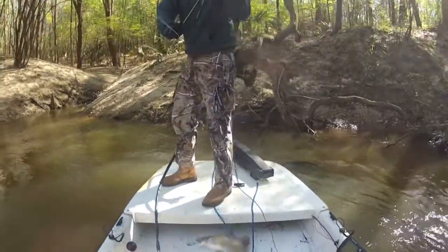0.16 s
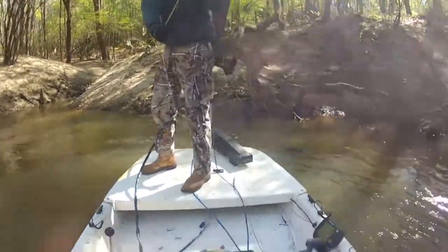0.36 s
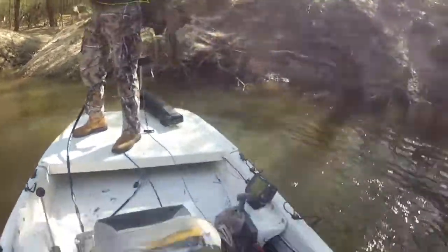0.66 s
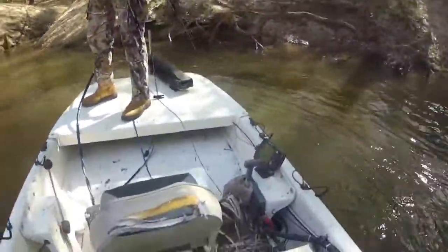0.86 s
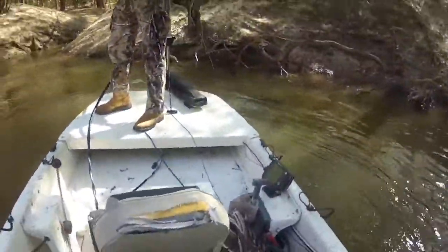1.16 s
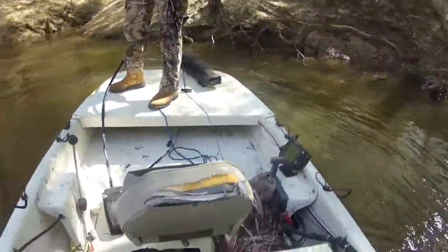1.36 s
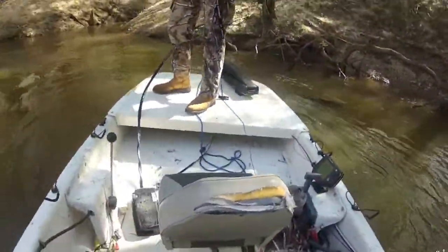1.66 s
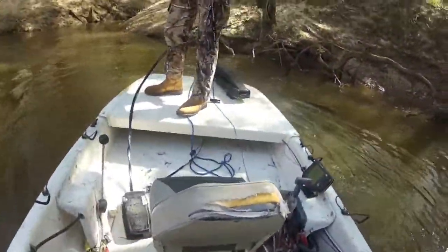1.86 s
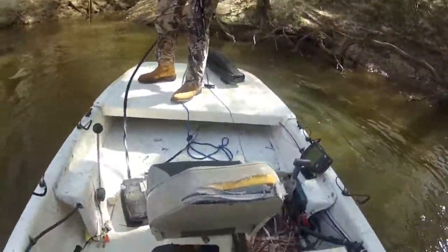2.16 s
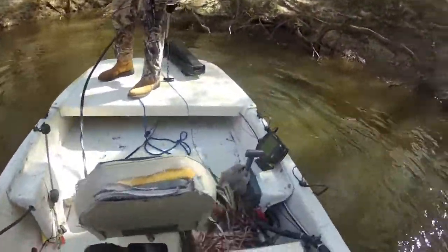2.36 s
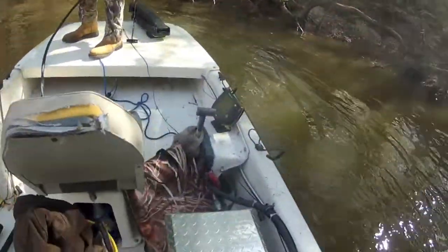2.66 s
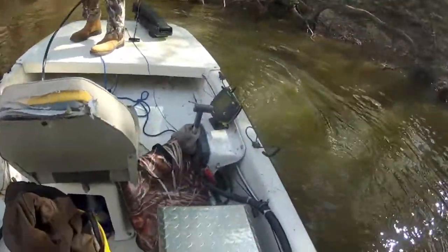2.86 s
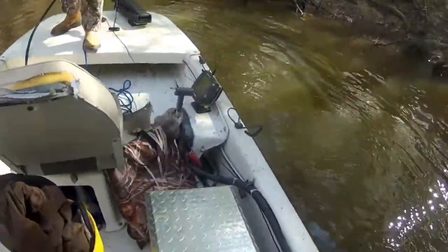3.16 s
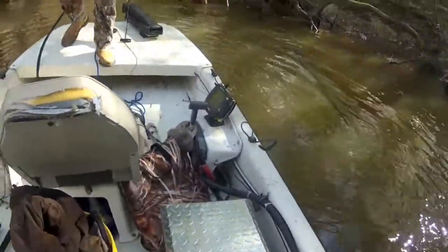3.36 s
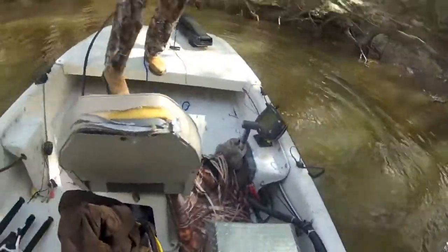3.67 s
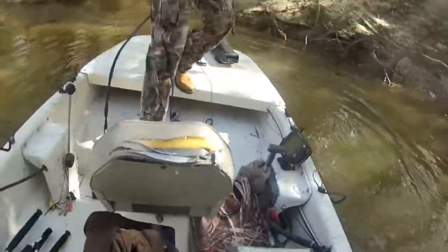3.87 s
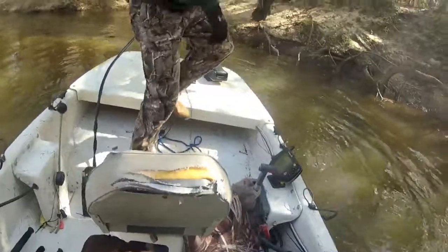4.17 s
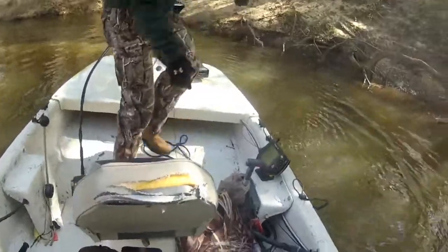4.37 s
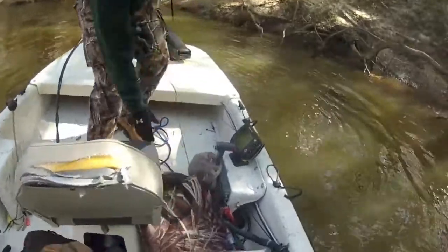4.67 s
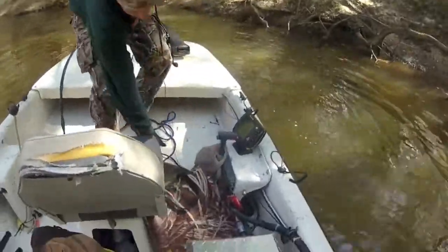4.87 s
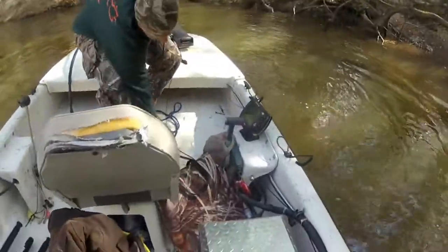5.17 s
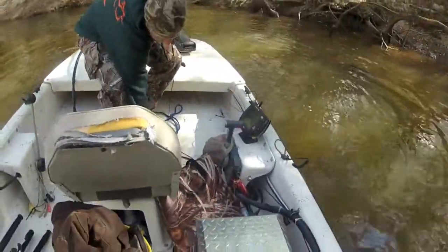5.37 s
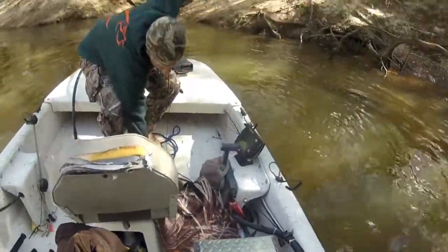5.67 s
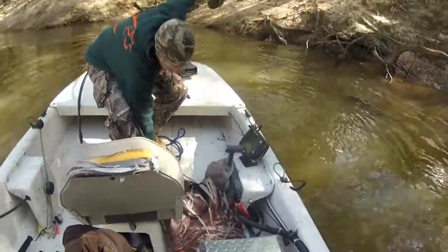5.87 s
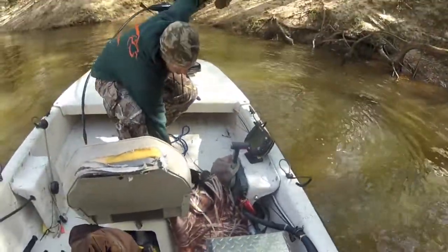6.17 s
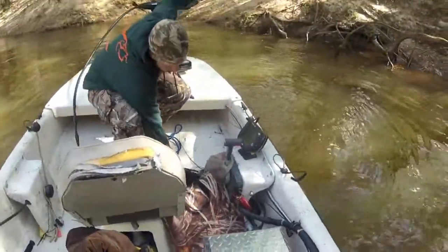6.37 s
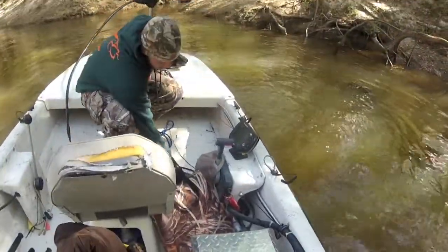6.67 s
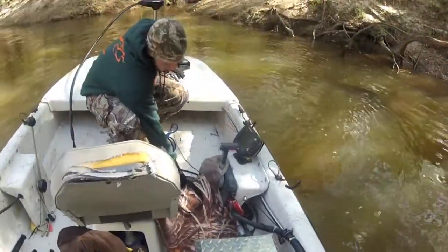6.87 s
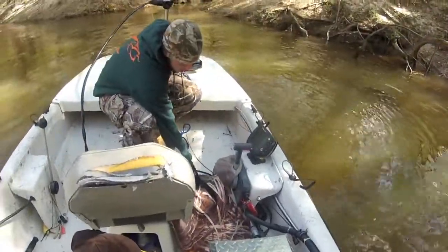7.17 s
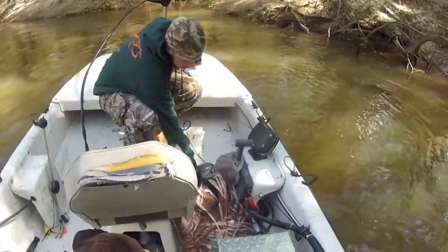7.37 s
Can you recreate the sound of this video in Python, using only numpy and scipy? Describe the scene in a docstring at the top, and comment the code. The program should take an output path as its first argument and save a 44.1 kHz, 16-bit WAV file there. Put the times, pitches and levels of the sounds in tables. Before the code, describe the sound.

On a small open boat on a quiet river, water laps the hull in short bubbly surges. The first two seconds are busiest, with soft low thumps and bright knocks; a hard crack and tiny rattle come just after three seconds, a strong splashy knock past four, then sparser laps. Drops trickle throughout. The microphone sits close in a sealed housing, boxy, mono, with coarse treble.

```python
"""Water laps against a small open boat on a river, heard as through a sealed housing.
Surges shape bubble fizz along the side, stray ticks and noise that drives hull modes; soft thumps swing low.
Drops trickle back as patter and short rings; gear and water knock on the sides over a steady fading rumble.
A 12 kHz sample-and-hold mirrors the sound in the treble."""
import sys
import numpy as np
from scipy import signal
from scipy.fft import rfft, irfft, next_fast_len
from scipy.io import wavfile

SR = 44100
rng = np.random.default_rng(int(sys.argv[2]) if len(sys.argv) > 2 else 0)


def bounce(signal):
    """Save signal as a 16-bit WAV file at the path given by the first command-line argument."""
    frames = np.transpose(np.atleast_2d(signal))
    limited = np.clip(frames, -1, 1)
    pcm = np.round(limited * 32767).astype(np.int16)
    wavfile.write(sys.argv[1], SR, pcm)


N = 331178

# relative spectrum of water on the side: f/Hz, density/dB
WATER_SPECTRUM = [(150, -47), (250, -4.5), (511, -10.5), (583, -14), (648, -3.5), (701, -12), (938, -4.5),
                  (1160, -13.5), (1840, 1.5), (2370, 1), (2890, -11.5), (3480, -1), (4470, -37.5),
                  (5170, -17), (5900, -52), (7670, -51), (13000, -120)]


def from_db(db):
    """Amplitude gain of a level in dB."""
    return 10 ** (np.asarray(db) / 20)


def rms_one(x):
    """Scale to rms 1."""
    return x / np.sqrt(np.mean(x ** 2) + 1e-20)


def peak_one(x):
    """Scale to peak 1."""
    return x / np.max(np.abs(x))


def in_time(rows):
    """Interpolate each column after the first (t/s) to every sample."""
    t_s, *columns = np.transpose(rows)
    return [np.interp(np.arange(N) / SR, t_s, column) for column in columns]


def drift(rate_hz):
    """Slow noise: white noise through two equal one-pole low-passes, rms 1."""
    r = np.exp(-2 * np.pi * rate_hz / SR)
    white = rng.standard_normal(N + SR)
    settled = signal.lfilter([1], [1, -2 * r, r * r], white)[SR:]
    return rms_one(settled)


def colour(x, spectrum, size=4096):
    """Minimum-phase filter by the folded cepstrum; white noise keeps its rms."""
    hz, db = np.transpose(spectrum)
    log_bins = np.log(np.fft.rfftfreq(size, 1 / SR) + 1)
    log_gain = np.log(from_db(np.interp(log_bins, np.log(hz), db)))
    cepstrum = irfft(log_gain)
    cepstrum[1:size // 2] *= 2
    cepstrum[size // 2 + 1:] = 0
    pulse = irfft(np.exp(rfft(cepstrum)))
    unit_pulse = pulse / np.sqrt(np.sum(pulse ** 2))
    return signal.oaconvolve(x, unit_pulse)[:len(x)]


def resonance(x, hz, width_hz):
    """Two-pole resonance, gain about 1 on top."""
    r = np.exp(-np.pi * width_hz / SR)
    zeros = [(1 - r * r) / 2, 0, (r * r - 1) / 2]
    poles = [1, -2 * r * np.cos(2 * np.pi * hz / SR), r * r]
    return signal.lfilter(zeros, poles, x)


def ringing(x, hz, width_hz):
    """The resonance twice, for steep skirts."""
    return resonance(resonance(x, hz, width_hz), hz, width_hz)


def grains(per_s, spread_db, clump_db, clump_rate_hz):
    """Random clicks of uneven size and either sign, in clumps; rms 1."""
    sizes = from_db(spread_db * np.minimum(rng.exponential(1, N), 4))
    signs = rng.choice([-1, 1], N)
    struck = rng.random(N) < per_s / SR
    clumps = from_db(clump_db * np.minimum(drift(clump_rate_hz), 1.6))
    return rms_one(sizes * signs * struck * clumps)


def surges():
    """Wash level, rumble drive and brightness (dB): powers of surges that build and ebb add to a calm."""
    # crest/s, wash level/dB, build-up/s, ebb/s, rumble drive/dB re wash, brightness/dB per zone
    surge_rows = [(0.125, -45.5, 0.02, 0.19, 8, -0.5), (0.311, -37.5, 0.056, 0.08, 9, -0.5),
                  (0.521, -42.5, 0.11, 0.057, 6.5, -1), (0.761, -47, 0.25, 0.082, 7.5, 0.5),
                  (0.894, -38, 0.034, 0.02, -4.5, 4.5), (1.118, -33, 0.09, 0.12, -1.5, -1),
                  (1.32, -40, .12, 0.072, -2, -0.5), (1.61, -46.5, 0.13, 0.044, -7, 0.5),
                  (1.76, -31, 0.088, 0.19, -0.5, -0.5), (1.92, -38, 0.15, 0.21, 0.5, -1.5),
                  (2.149, -43, 0.06, 0.11, 8, 2), (2.598, -50.5, 0.52, 0.26, -4, 2),
                  (2.897, -38, 0.15, 0.065, -0.5, 1.5), (2.99, -44.5, 0.034, 0.042, 4, 0.5),
                  (3.18, -61.5, 0.11, 0.18, 17, 3), (3.335, -49.5, 0.077, .06, -2, -3.5),
                  (3.41, -43.5, 0.065, .06, -2.5, 1.5), (3.598, -39.5, 0.12, 0.12, 6.5, 0.5),
                  (3.97, -51, 0.045, 0.15, -10, -2), (4.3, -30, 0.072, 0.11, 3.5, 3),
                  (4.46, -47, .06, 0.13, -5, 0.5), (4.64, -44, 0.075, 0.063, 4, -1.5),
                  (4.83, -47.5, 0.094, 0.065, -1, -0.5), (4.99, -47.5, 0.081, 0.039, -2, 5),
                  (5.42, -50.5, 0.055, 0.035, 11.5, -1), (5.475, -42.5, 0.028, 0.017, -1, 2.5),
                  (5.58, -32.5, 0.069, 0.077, 2, 0), (5.992, -49.5, 0.25, 0.06, 6.5, -0.5),
                  (6.209, -43.5, 0.078, 0.14, -4.5, -1), (6.65, -47, 0.026, 0.037, 1.5, 0.5),
                  (6.81, -40, 0.062, 0.17, -0.5, -0.5), (6.89, -43.5, 0.091, 0.15, 4, -1.5),
                  (7.07, -51, 0.057, 0.067, 5, -1), (7.41, -40, 0.09, 0.094, -2, 1)]
    span_db = 22.5  # fall one build-up before or one ebb after the crest
    build_power, ebb_power = 1.8, 1.85
    calm_wash_db, calm_rumble_db = -63.5, -54.5
    t = np.arange(0, N, 64) / SR
    crest_s, crest_db, build_s, ebb_s, push_db, tilt_db = np.transpose(surge_rows)[:, :, None]
    before = np.abs((t - crest_s) / build_s) ** build_power
    after = np.abs((t - crest_s) / ebb_s) ** ebb_power
    away = np.where(t < crest_s, before, after)
    power = from_db(2 * np.maximum(crest_db - span_db * away, -200))
    wash_power = power.sum(0) + from_db(2 * calm_wash_db)
    rumble_power = (power * from_db(2 * push_db)).sum(0) + from_db(2 * calm_rumble_db)
    bright_db = (power * tilt_db).sum(0) / wash_power
    rows = [t, 10 * np.log10(wash_power), 10 * np.log10(rumble_power), bright_db]
    return in_time(np.transpose(rows))


def wash(level_db, bright_db):
    """Bubble fizz: zones share some clicks and have flurries of their own; brightness tilts them."""
    # pass-bands: low f/Hz, high f/Hz
    zones_hz = [(250, 1300), (1300, 2100), (2100, 3000), (3000, 4400), (4400, 6500)]
    shared = grains(4000, spread_db=0.5, clump_db=4.0, clump_rate_hz=108)
    out = 0
    for step, zone_hz in enumerate(zones_hz, start=-2):
        flurries = grains(1200, spread_db=2.5, clump_db=5.5, clump_rate_hz=18.5)
        fizz = (shared + 0.89 * flurries) * from_db(level_db + step * bright_db)
        band = signal.butter(2, zone_hz, "band", fs=SR, output="sos")
        out = signal.sosfilt(band, fizz) - out  # neighbours get opposite signs
    return colour(out, WATER_SPECTRUM)


def rumble(level_db):
    """The push of the water, lumpy noise, drives the panel modes of the hull."""
    # modes: f/Hz, width/Hz, relative level/dB
    modes = [(35, 40.3, -6.5), (91, 32.6, 0.5), (194.3, 40.9, -3), (484, 11.6, -16.5), (921, 29, -22)]
    push = rng.standard_normal(N) * from_db(level_db + 2.0 * drift(7.5))
    out = np.zeros(N)
    for k, (hz, width_hz, db) in enumerate(modes):
        out += (-1) ** k * from_db(db) * resonance(push, hz, width_hz)
    return from_db(26.5) * out


def thumps():
    """A soft blow swells over about a cycle and leaves the hull swinging."""
    # onset/s, peak/dB, f/Hz
    thump_rows = [(0.031, -33.5, 85), (0.122, -19.5, 84), (0.201, -25, 84), (0.288, -35, 77),
                  (0.323, -18, 69.4), (0.368, -19.5, 86), (0.495, -32, 40.3), (0.668, -28, 38),
                  (1.081, -26, 88), (1.121, -19.5, 86), (1.298, -30, 103), (1.62, -33, 88.5),
                  (1.728, -21, 77), (1.741, -13, 58.7), (1.789, -30, 92), (1.929, -27, 90),
                  (2.14, -28, 64.5), (2.548, -28.5, 83), (2.856, -28.5, 98), (2.908, -28.5, 102.5),
                  (3.136, -28, 91), (3.801, -28.5, 82), (3.841, -33, 90), (4.275, -19, 106.4),
                  (4.299, -23, 95.7), (4.339, -27, 99), (4.6, -32, 64), (4.998, -29, 103),
                  (5.503, -27.5, 92), (5.561, -37, 88.5), (5.597, -23.5, 91), (6.611, -34, 94),
                  (6.789, -30, 97), (6.871, -34, 106), (6.93, -30, 100)]
    t60_s = 0.14
    out, age_s = np.zeros(N + SR), np.arange(SR // 2) / SR
    signs = rng.choice([-1, 1], len(thump_rows))
    for (onset_s, peak_db, hz), sign in zip(thump_rows, signs):
        envelope = (1 - np.exp(-1.5 * hz * age_s)) * from_db(-60 * age_s / t60_s)
        swing = envelope * np.sin(2 * np.pi * hz * age_s)
        at = round(onset_s * SR)
        out[at:at + len(age_s)] += sign * from_db(peak_db) * peak_one(swing)
    return out[:N]


def ticks(wash_db):
    """Stray droplets strike the side as short noise bursts, harder during a surge."""
    mean_db, follow_share, t60_s = -50, 0.52, 0.028
    hits = grains(45, spread_db=3.5, clump_db=2.0, clump_rate_hz=5.0)
    r = from_db(-60 / (t60_s * SR))
    envelope = signal.lfilter([1], [1, -r], np.abs(hits))
    bursts = rms_one(envelope * rng.standard_normal(N))
    level_db = mean_db + follow_share * (wash_db - wash_db.mean())
    return colour(bursts * from_db(level_db), WATER_SPECTRUM)


def trickle():
    """Drops fall back: a patter, and short rings whose pitches scatter about a moving centre."""
    # t/s, drive/dB, centre f/Hz of the rings
    drip = [(0, -48.5, 2460), (0.3, -45, 2340), (0.5, -45, 2430), (0.68, -40.5, 2710), (0.9, -50.5, 2340),
            (1.2, -35, 2420), (1.45, -51, 2320), (1.72, -37, 2380), (2.15, -50.5, 2450), (2.65, -36, 2450),
            (3.07, -43.5, 2420), (3.3, -52, 2550), (3.68, -37.5, 2690), (4.22, -51.5, 2700),
            (4.45, -41, 2660), (4.7, -47.5, 2690), (5.05, -45, 2700), (5.4, -52, 2430), (6.05, -46.5, 2400),
            (6.4, -45, 2650), (6.68, -44.5, 2600), (6.9, -43, 2270), (7.2, -58, 2370), (7.51, -41, 2450)]
    # patter spectrum: f/Hz, relative density/dB
    patter_spectrum = [(150, -33), (250, 3.5), (408, -49), (511, -7), (591, -20), (780, -11), (1400, -28),
                       (2340, -1), (3620, -52), (4130, -19), (5900, -33.5), (7670, -65), (13000, -120)]
    level_db, centre_hz = in_time(drip)
    drops = grains(9000, spread_db=-0.5, clump_db=3.5, clump_rate_hz=25) * from_db(level_db)
    pitches_hz = np.geomspace(1900, 3100, 18)
    dealt = rng.integers(0, 18, N)  # each drop gets one pitch
    rings = np.zeros(N)
    for k, hz in enumerate(pitches_hz):
        nearness = np.exp(-.5 * (np.log(hz / centre_hz) / 0.03) ** 2)
        rings += ringing(drops * (dealt == k) * nearness, hz, width_hz=100)
    return from_db(-9.0) * colour(drops, patter_spectrum) + from_db(25.5) * rings


def knocks():
    """Sharp touch, dying contacts and faint spatter drive a crack, a pitched ring and a hollow low part."""
    # onset/s, crack-and-ring peak/dB, ring f/Hz, t60/s, hollow peak/dB re crack and ring, hollow f/Hz
    knock_rows = [(0.126, -18.5, 2000, 0.02, -14, 880), (0.166, -26.5, 2150, 0.055, -5.5, 467),
                  (0.201, -27, 2290, 0.061, -6, 950), (0.258, -17, 2630, 0.15, -18, 473),
                  (0.334, -17.5, 2170, 0.086, -6.5, 980), (0.501, -23, 1240, 0.069, -9, 940),
                  (0.667, -32.5, 2300, 0.09, 4, 440), (0.707, -27.5, 2410, 0.031, -18, 810),
                  (0.881, -19.5, 2380, 0.07, -9, 1424), (1.454, -25.5, 2440, 0.093, -7, 760),
                  (1.598, -25.5, 1910, 0.14, -20, 921), (1.639, -42, 2260, 0.07, 8, 800),
                  (1.706, -17, 2270, 0.14, -16, 725), (2.067, -25.5, 2160, 0.04, -2.5, 464),
                  (2.225, -26.5, 2270, 0.03, -18, 921), (2.344, -30.5, 2740, 0.15, -9.5, 790),
                  (2.451, -23, 2280, 0.12, -20, 565), (2.559, -27, 2530, 0.028, -31, 902),
                  (2.61, -20, 2340, 0.19, -17, 710), (2.63, -21, 2200, 0.035, -3, 710),
                  (2.909, -20.5, 2360, 0.019, -33, 390), (2.991, -25.5, 2530, 0.032, -39, 350),
                  (3.04, -29.5, 2320, 0.093, -29, 657), (3.076, -32, 2850, 0.25, -38, 444),
                  (3.128, -31, 2630, 0.054, -11, 689), (3.152, -31, 1750, 0.065, 7, 770),
                  (3.24, -32, 2330, 0.33, -7.5, 800), (3.32, -17.5, 2320, 0.13, -11.5, 824),
                  (3.402, -10, 2430, 0.04, -59, 1040), (3.745, -27.5, 2410, 0.12, -6, 770),
                  (3.864, -31.5, 2400, 0.16, -8.5, 690), (3.998, -21.5, 2400, 0.063, -10, 755),
                  (4.11, -37, 2500, 0.17, 6, 460), (4.182, -23, 2300, 0.14, -3, 465),
                  (4.270, -11.5, 2624, 0.12, -17, 774), (4.402, -33, 2340, 0.076, -30, 370),
                  (4.598, -23.5, 2410, 0.065, -23, 947), (4.661, -27.5, 2380, 0.052, -22, 408),
                  (4.811, -27, 2230, 0.063, -39, 404), (4.819, -20, 2325, 0.075, -57, 905),
                  (5.259, -37.5, 2250, 0.091, -2, 880), (5.315, -30.5, 2650, 0.089, -40, 869),
                  (5.399, -21.5, 2280, 0.052, -17, 1210), (5.547, -19, 1740, 0.045, -33, 377),
                  (5.575, -19.5, 1770, 0.14, -35, 991), (5.847, -30, 1500, 0.071, -1.5, 730),
                  (6.28, -38, 1840, 0.044, -17, 980), (6.613, -34.5, 2520, 0.1, -4, 377),
                  (6.64, -31.5, 2260, 0.14, -8, 915), (7.37, -22.5, 1820, 0.075, -14, 360)]
    # crack spectrum: f/Hz, relative density/dB
    crack_spectrum = [(150, -37), (250, -13.5), (989, -21), (1550, -9), (2670, 1), (3090, -14), (3570, -6),
                      (4130, -22), (4970, -15.5), (5900, -33), (7670, -38.5), (13000, -120)]
    out, age_s = np.zeros(N + SR), np.arange(SR // 4) / SR
    contacts = rng.standard_normal((len(knock_rows), len(age_s)))
    touch = 2.7 * np.exp(-age_s / 0.0012)
    spatter = 0.037 * np.exp(-age_s / 0.081)
    attack = 1 - np.exp(-age_s / 0.0011)
    for (onset_s, peak_db, hz, t60_s, hollow_db, hollow_hz), noise in zip(knock_rows, contacts):
        dying = from_db(-60 * age_s / max(t60_s, .01))
        burst = noise * (dying + touch + spatter) * attack
        crack = colour(burst, crack_spectrum, size=512)
        bright = from_db(20.0) * ringing(burst, hz, width_hz=292) + crack
        hollow = resonance(burst, hollow_hz, width_hz=16)
        hollow += .5 * resonance(burst, 0.96 * hollow_hz, width_hz=390)
        knock = peak_one(bright) + from_db(hollow_db) * peak_one(hollow)
        at = round(onset_s * SR)
        out[at:at + len(age_s)] += from_db(peak_db) * knock
    return out[:N]


def rattle():
    """Gear rattles across the floor: a short, even run of small contacts."""
    # f/Hz, relative density/dB
    rattle_spectrum = [(180, -43), (300, -28), (453, -10), (588, -24), (783, -9), (865, -16), (2200, -15.5),
                       (4660, -34), (5270, -20.5), (5900, -62), (7670, -91), (13000, -120)]
    start_s, end_s, run_db = 3.124, 3.215, -39.5
    level_db, = in_time([(start_s - .01, -90), (start_s + 0.0017, run_db),
                         (end_s, run_db), (end_s + 0.012, -90)])
    contacts = grains(2900, spread_db=6.0, clump_db=-0.5, clump_rate_hz=27)
    return colour(contacts * from_db(level_db), rattle_spectrum)


def swell():
    """Steady rumble: coloured noise that fades evenly in dB over the whole scene."""
    # f/Hz, relative density/dB
    swell_spectrum = [(8.8, -37), (15, -2), (92, 2), (198, -14), (584, -25.5), (892, -29.5), (1310, -29),
                      (1500, -46), (1950, -25), (3300, -120)]
    middle_db, fade_db = -48, 5
    level_db = middle_db + fade_db * np.linspace(.5, -.5, N)
    return from_db(level_db) * colour(rng.standard_normal(N), swell_spectrum)


def scene():
    """Sum all sources into one channel."""
    wash_db, rumble_db, bright_db = surges()
    water = wash(wash_db, bright_db) + rumble(rumble_db) + thumps() + ticks(wash_db) + trickle()
    return (water + knocks() + rattle() + swell())[None]


def record(dry):
    """Add hiss; sampling mirrors the sound about the hold rate, holding weights it by a sinc; cut the top."""
    hold_hz, cutoff_hz = 12000, 15250
    hiss_before_filters_db = -67.5
    noisy = dry + from_db(hiss_before_filters_db) * rng.standard_normal(dry.shape)
    low_pass = signal.butter(8, hold_hz / 2, fs=SR, output="sos")
    slow = signal.sosfilt(low_pass, noisy)
    sampled = slow * (1 + 2 * np.cos(2 * np.pi * hold_hz * np.arange(N) / SR))
    size = next_fast_len(N)
    hold_gain = np.sinc(np.fft.rfftfreq(size, 1 / SR) / hold_hz)
    held = irfft(rfft(sampled, size) * hold_gain, size)[:, :N]
    top_cut = signal.ellip(11, .5, 70, cutoff_hz, fs=SR, output="sos")  # 0.5 dB ripple, 70 dB stop
    return signal.sosfilt(top_cut, held)


dry = scene()
out = record(dry)
bounce(out)
```